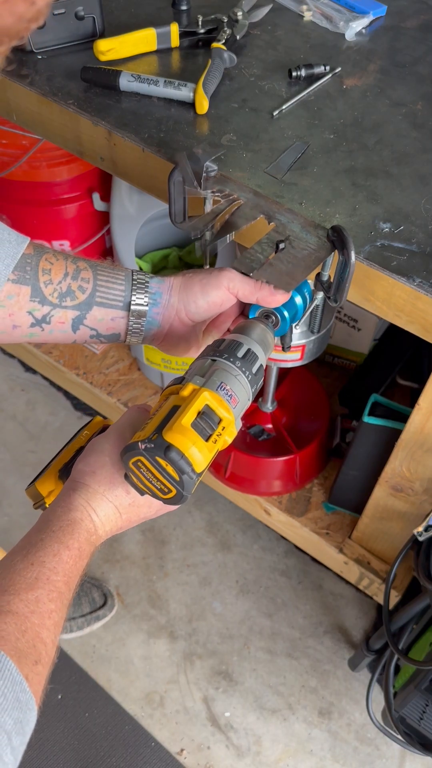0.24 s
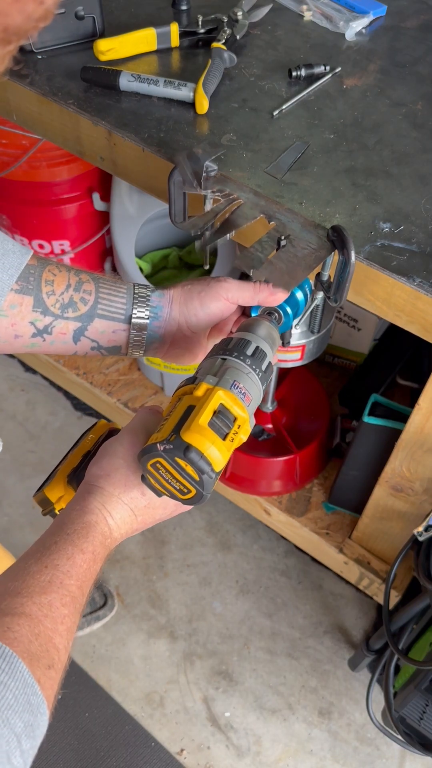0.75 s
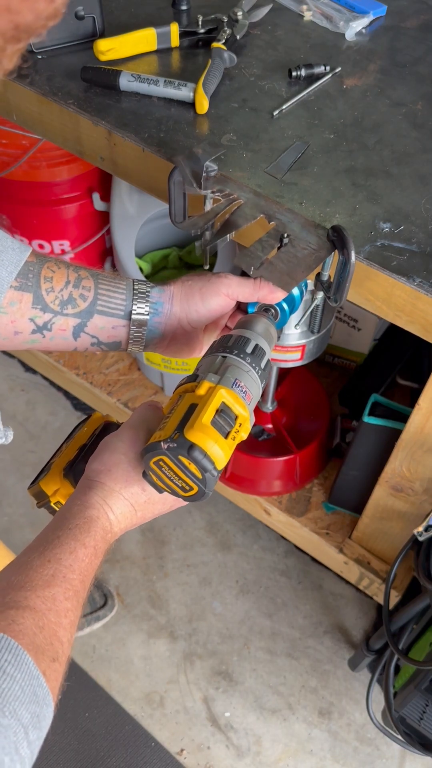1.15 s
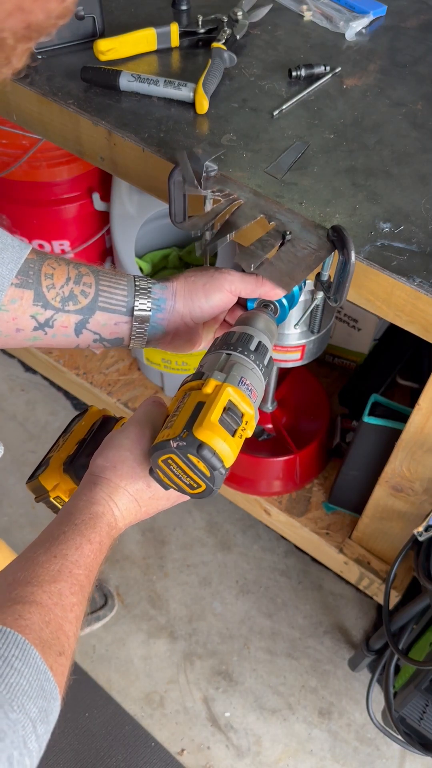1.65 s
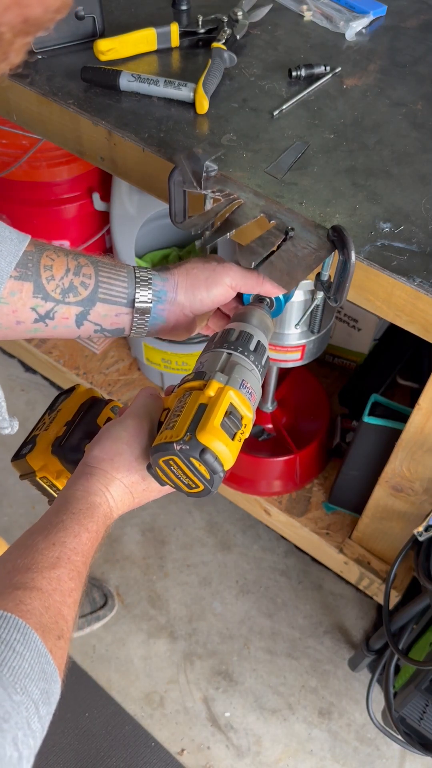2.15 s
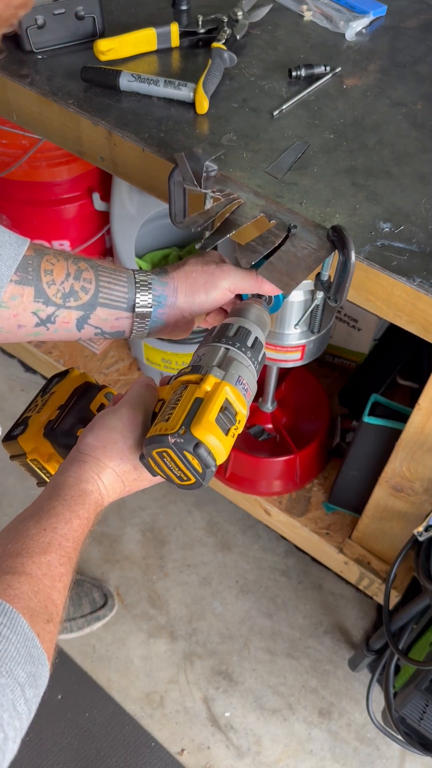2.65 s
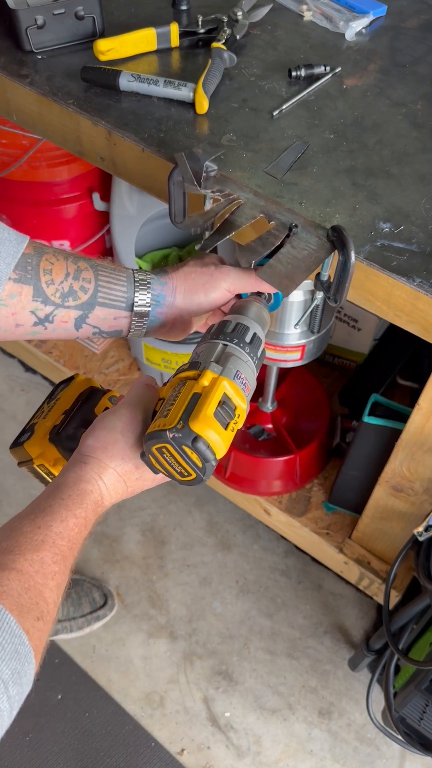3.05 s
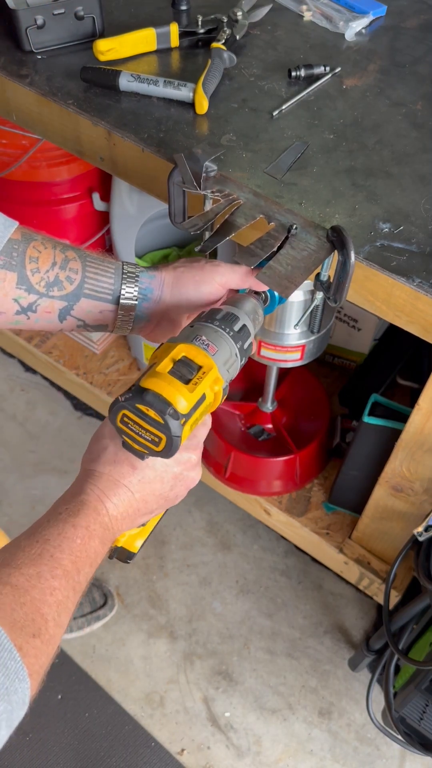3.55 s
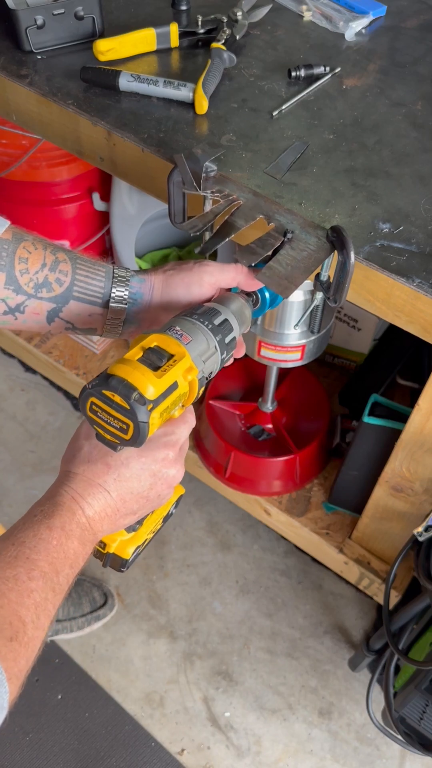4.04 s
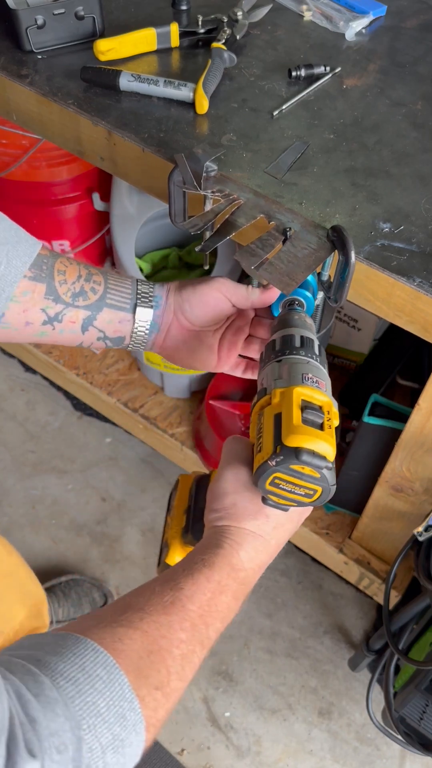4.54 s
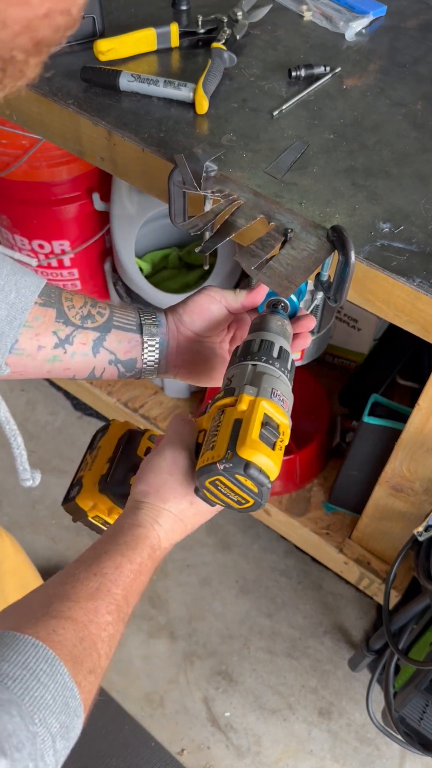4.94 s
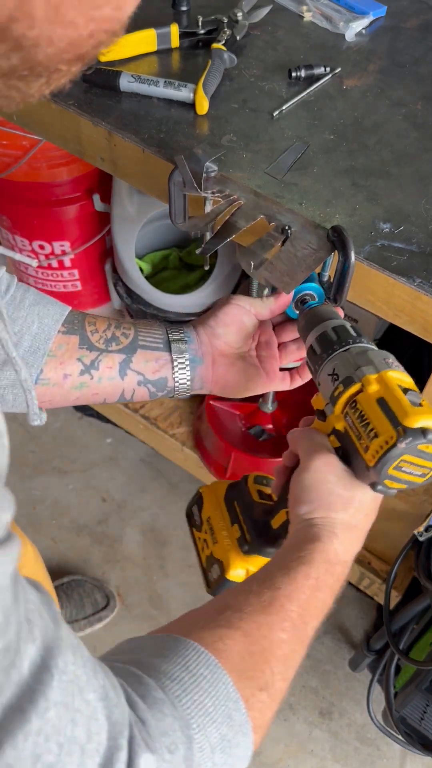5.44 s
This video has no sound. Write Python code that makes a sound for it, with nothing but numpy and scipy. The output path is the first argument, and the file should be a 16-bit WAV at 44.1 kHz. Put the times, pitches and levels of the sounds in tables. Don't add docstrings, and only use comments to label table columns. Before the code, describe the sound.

A loud, dry machine-gun clatter of punched sheet metal, with tinny ringing and a steady motor whine, briefly slackens early and then runs on. It pauses, a trigger clicks, and the motor whines through a weaker pull. Faint scuffs and a tiny can tap fill the next gap before hard cutting returns. Close stereo microphone, garage reverberation, occasional low air thumps.

```python
import sys
import numpy as np
from scipy import signal
from scipy.fft import rfft, irfft
from scipy.io import wavfile
from scipy.ndimage import uniform_filter1d

SR = 44100
rng = np.random.default_rng(int(sys.argv[2]) if len(sys.argv) > 2 else 0)


def convert_level_to_amplitude(level_db):
    exponent = np.asarray(level_db, float) / 20
    return 10 ** exponent


def generate_wav(signal):
    frames = np.transpose(np.atleast_2d(signal))
    scaled = np.clip(frames, -1, 1) * 32767
    pcm = np.round(scaled).astype(np.int16)
    wavfile.write(sys.argv[1], SR, pcm)


N = 250929


def at_hz(points, hz):
    points_hz, values = np.transpose(points)
    return np.interp(np.log(np.maximum(hz, 1)), np.log(points_hz), values)


def rms_one(x):
    return x / np.sqrt(np.mean(x ** 2) + 1e-20)


def played(spans, fade_s):
    s, *columns = np.transpose(np.vstack(spans))
    t = np.arange(N) / SR
    is_open = sum((t >= span[0][0]) & (t <= span[-1][0] + .01) for span in spans)
    gate = is_open.clip(0, 1) * 1.
    return uniform_filter1d(gate, int(fade_s * SR), mode="nearest"), [np.interp(t, s, c) for c in columns]


def band(x, low_hz, high_hz, order=2):
    sos = signal.butter(order, [low_hz, high_hz], "band", fs=SR, output="sos")
    return signal.sosfilt(sos, x + 1e-18)


def coloured(x, points):
    return irfft(rfft(x) * convert_level_to_amplitude(at_hz(points, np.fft.rfftfreq(N, 1 / SR))), N)


def drift(rate_hz):
    steps = rng.standard_normal(int(N / SR * rate_hz * 2) + 2)
    return np.interp(np.linspace(0, len(steps) - 1, N), np.arange(len(steps)), steps) * 1.285


def grains(count, spread_db):
    size = convert_level_to_amplitude(spread_db * np.minimum(rng.exponential(1, count), 5))
    return size * rng.standard_normal(count)


def sheet(x, wander_db):
    # frequency in Hz, width in Hz, gain in dB, liveliest from and to in seconds.
    modes = [(694, 28, 7, -1.5, 1), (810, 15, 3.5, 6, 2.7), (1110, 30, 3.5, -0.3, 1.55),
             (1309, 50, 6.5, 2.1, 2.3), (1700, 320, 3.5, 2, 2.9), (2240, 30, 3.5, -2, 0.68),
             (2650, 60, 4, -0.6, 1.5), (3850, 830, 4, 1.5, 5.7), (7240, 61, 4.5, 9, 2.5),
             (8050, 300, 3, 1.5, 9.6), (8700, 530, 2, -1, 4.3)]
    held_db = -3
    out, t = x.copy(), np.arange(N) / SR
    for hz, width_hz, top_db, start_s, end_s in modes:
        outside_s = np.maximum(start_s - t, t - end_s)
        level_db = top_db + held_db * np.clip(outside_s / 0.24, 0, 1)
        r = np.exp(-np.pi * width_hz / SR)
        gain = (1 - r * r) / 2
        ringing = signal.lfilter([gain, 0, -gain], [1, -2 * r * np.cos(2 * np.pi * hz / SR), r * r], x)
        out += np.maximum(convert_level_to_amplitude(level_db + wander_db * drift(2.5)) - 1, 0) * ringing
    return out


def cutting_strokes():
    # start in seconds, peak in dB, thud and clank in dB against
    # the peak, clank pitch in Hz.
    cut_strokes = [(0.024, -3, -20, -15.5, 2270), (0.07, -7, -15, -11.5, 2270), (0.114, -6, -17.5, -12, 2270),
                   (0.158, -10, -15, -10.5, 2620), (0.202, -8, -18.5, -17, 2290),
                   (0.515, -7, -21, -15, 2280), (0.56, -5.5, -12.5, -14.5, 2770),
                (0.605, -4, -15.5, -12.5, 3730), (0.65, -8, -18.5, -13.5, 2560),
                (0.694, -6.5, -14, -15, 2450), (0.739, -5.5, -17.5, -13, 2550),
                (0.784, -6.5, -19, -11, 2750), (0.828, -4.5, -23, -16, 2750), (0.872, -5.5, -25, -13, 3500),
                (0.917, -7.5, -20.5, -10.5, 3000), (0.964, -10, -13.5, -12, 2650),
                (1.008, -8, -13.5, -16, 2660), (1.053, -4, -18.5, -16, 2620),
                (1.097, -8.5, -16, -14.5, 2610), (1.143, -5.5, -23.5, -16.5, 2650),
                (1.187, -8, -14, -12.5, 3650), (1.232, -5.5, -20.5, -13.5, 3000),
                (1.278, -7, -20, -13.5, 2730), (1.322, -8, -13.5, -19.5, 2720),
                (1.368, -8, -12.5, -16.5, 2627), (1.412, -6, -19, -15.5, 1970),
                (1.457, -5, -18.5, -15, 2880), (1.502, -7, -13, -18, 4200), (1.546, -9, -13.5, -17.5, 2820),
                (1.592, -8.5, -15.5, -19, 1900), (1.637, -8, -13.5, -13.5, 3720),
                (1.681, -11, -17.5, -11, 1700), (1.725, -7.5, -15.5, -14, 3740), (1.77, -7, -15, -15, 2300),
                (1.815, -8, -19.5, -16, 3060),
                   (1.86, -9, -11, -14.5, 2847), (1.905, -7, -19, -13, 3860), (1.95, -8, -14.5, -16.5, 3110),
                  (1.993, -10.5, -12.5, -14.5, 3100), (2.038, -3, -21.5, -15.5, 4010),
                  (2.084, -8, -18.5, -15, 4200), (2.129, -12.5, -15, -14.5, 1840),
                  (2.174, -10, -17, -16.5, 1700), (2.218, -11.5, -12, -15.5, 1757),
                  (2.261, -8.5, -13, -14.5, 3040), (2.307, -5.5, -19, -17.5, 2240),
                  (2.353, -7.5, -16.5, -13.5, 3600), (2.397, -9, -12.5, -13, 3910),
                  (2.441, -9, -16, -14, 3276), (2.486, -10, -12.5, -12.5, 3880),
                  (2.532, -6, -17.5, -13.5, 3600), (2.576, -15.5, -8, -9.5, 3660),
                  (2.621, -7, -16.5, -10, 3200), (2.666, -8, -19, -16, 3850), (2.71, -8, -15.5, -14, 3770),
                  (2.755, -12, -18, -15, 3720), (2.799, -4.5, -20, -11, 3970),
                  (2.846, -4.5, -16, -17.5, 2220), (2.889, -8.5, -15, -10.5, 3730),
                  (2.935, -4, -21, -18, 3700), (2.979, -9, -12, -16, 2375),
                  (3.025, -10.5, -22.5, -14, 2240), (3.068, -6, -17, -13, 2970),
                  (3.113, -7.5, -18, -13.5, 4270),
                   (5.33, -7.5, -27, -9, 3780), (5.376, -9, -16.5, -17.5, 4460),
                (5.422, -1.5, -17, -15.5, 3840), (5.467, -3.5, -13.5, -12, 4600),
                (5.513, -8, -11, -21, 2300), (5.556, -6.5, -18, -14, 4350), (5.603, -5.5, -16, -14, 4060),
                (5.649, -6, -20.5, -16, 4140)]
    # break in seconds, edge peak in dB, thud
    # pitch in Hz, tear in ms.
    breaks = [(0.0254, -10, 1320, 2.2), (0.0715, -10.5, 750, 3.1), (0.1146, -10.5, 1310, 3.6),
              (0.1595, -17, 1640, 3.1), (0.2037, -14.5, 1340, 1.9), (0.5161, -11, 1270, 1.8),
              (0.5623, -11.5, 750, 1.8), (0.6075, -12.5, 750, 3.7), (0.6528, -8.5, 750, 1.4),
              (0.6965, -12, 750, 2.8), (0.74, -11.5, 750, 1.3), (0.7849, -12, 750, 1.7),
              (0.8296, -11, 1300, 0.7), (0.8744, -14, 1310, 0.9), (0.919, -8.5, 1160, 1.0),
              (0.9661, -11, 1340, 1.3), (1.0098, -12.5, 1290, 2.2), (1.0549, -7.5, 1770, 0.8),
              (1.0991, -12.5, 1560, 1.9), (1.1442, -11.5, 1340, 1.5), (1.1895, -12, 1290, 1.8),
              (1.2338, -9.5, 1130, 0.7), (1.279, -11, 1110, 1.3), (1.3237, -10, 1130, 1.6),
              (1.3685, -11, 1290, 2.2), (1.4125, -9.5, 1150, 1.4), (1.4587, -12, 1090, 1.0),
              (1.5044, -10, 1320, 2.2), (1.548, -14.5, 1310, 2.4), (1.5938, -13.5, 1320, 2.8),
              (1.6375, -16.5, 1310, 2.2), (1.6819, -14, 1310, 1.6), (1.7258, -12.5, 1290, 1.7),
              (1.771, -10, 1560, 2.1), (1.8164, -11.5, 1290, 0.8),
              (1.8623, -13.5, 750, 2.6), (1.9086, -8.5, 1740, 1.0), (1.9515, -14, 1290, 1.7),
                    (1.9948, -14.5, 1300, 1.5), (2.04, -5, 1330, 0.8), (2.0855, -12.5, 1180, 1.6),
                    (2.1298, -17.5, 1850, 1.6), (2.1782, -16, 1300, 2.1), (2.2163, -17, 1290, 1.9),
                    (2.2638, -13.5, 750, 1.7), (2.3083, -8.5, 1210, 1.0), (2.355, -11.5, 1700, 1.2),
                    (2.3984, -15, 1290, 1.8), (2.4435, -11, 970, 0.8), (2.488, -19, 950, 1.7),
                    (2.5334, -14, 970, 1.2), (2.578, -19, 1320, 1.4), (2.6218, -12.5, 1280, 2.0),
                    (2.6677, -12, 1470, 0.7), (2.712, -13.5, 1310, 1.9), (2.7564, -10.5, 950, 0.7),
                    (2.8005, -10, 940, 0.9), (2.848, -9, 1600, 2.0), (2.8904, -15, 1310, 1.4),
                    (2.9367, -6, 1470, 0.7), (2.9806, -16, 970, 2.0), (3.0262, -12.5, 970, 1.0),
                    (3.0695, -11.5, 990, 1.0), (3.1151, -16, 900, 1.1), (5.3313, -16, 1180, 0.8),
                    (5.378, -9, 1340, 0.7), (5.4236, -6.5, 1340, 1.6), (5.4694, -10.5, 1310, 1.7),
                    (5.5147, -7, 1290, 1.0), (5.5603, -8.5, 1680, 1.6), (5.6048, -8.5, 1550, 0.8),
                    (5.65, -5.5, 900, 0.7)]
    part_db = [-2, -4, -20]
    _, peak_db, thud_db, clank_db, clank_hz = np.array(cut_strokes).T
    s, edge_db, thud_hz, tear_ms = np.array(breaks).T
    tear_ms = abs(tear_ms)
    snap_db = 0.95 * (edge_db - edge_db.mean()) + 6.5 * np.log10(tear_ms / 1.6)
    press_s, rub_db = np.full_like(s, .0032), np.full_like(s, -13.0)
    crack_db, shear_ms = edge_db + 3.8, 1.9 * tear_ms
    return [s, press_s, peak_db + thud_db + part_db[0], peak_db + clank_db + part_db[1],
            snap_db + part_db[2], crack_db, shear_ms, thud_hz, clank_hz, rub_db]


def lone_strokes():
    # start in seconds, strength in dB, shear in ms, brightness in dB.
    lone = [(.248, -28.5, 12, -2), (.47, -25.5, 26, -1), (3.182, -22, 5, 1.2), (3.721, -21.5, 12.5, -1),
            (3.773, -21, 14.4, 0), (3.819, -23.5, 15.5, 0.5), (3.871, -22, 8.8, 0),
            (4.045, -30.5, 9.6, 4.5), (4.091, -28.5, 11, -3), (4.136, -27.5, 13, 0),
            (4.187, -22.5, 7.6, -1), (5.172, -23, 13, -0.5), (5.235, -20, 6.8, -2),
            (5.283, -18.5, 13.2, -3)]
    s, strength_db, shear_ms, bright_db = np.transpose(lone)
    shear_ms = abs(shear_ms)
    strength_db = strength_db + 10 * np.log10(shear_ms / 20.0)
    press_s = .00022 * shear_ms
    thud_hz, clank_hz, rub_db = np.full_like(s, 1100.0), np.full_like(s, 3840), np.full_like(s, -30.0)
    return [s + .5 * press_s, press_s, strength_db - 5 - bright_db, strength_db - 1,
            strength_db + 4.5 + bright_db, strength_db - 7.0, shear_ms * .75, thud_hz, clank_hz, rub_db]


def punch():
    # from and to in Hz, level in dB.
    parts = [(789, 2010, 4), (1673, 3450, 2), (3000, 4620, 2), (5720, 14230, 1)]
    # time in seconds, share in the long strip 0-1.
    free_share = [(0, 0.7), (.9, 0.1), (1.6, 0.53), (3.1, 0.46), (3.8, 1), (5.2, 0.01), (5.69, 0)]
    shudders_db = [-1.5, -11.5, -6.5, -3.5]
    thud_width, clank_width = .07, 0.089
    length = 2048
    t = np.arange(length) / SR
    hits = np.zeros(N + length)
    shudder = np.clip(t / 0.0072, 0, 1) * np.exp(-t / 0.0067)
    strokes = np.hstack([cutting_strokes(), lone_strokes()]).T
    for s, press_s, thud_db, clank_db, snap_db, crack_db, shear_ms, thud_hz, clank_hz, rub_db in strokes:
        after = t - press_s
        press = 0.32 * t / press_s
        shear = np.where(after < 0, press, np.exp(-abs(after) / (0.0008 * shear_ms)))
        rub = convert_level_to_amplitude(rub_db + 1.5 * rng.standard_normal()) * np.exp(-((after - .022) / 0.003) ** 2)
        burst = grains(length, spread_db=2.0)

        sounds = []
        for k, (low_hz, high_hz, level_db) in enumerate(parts):
            force = shear + convert_level_to_amplitude(shudders_db[k]) * shudder
            if k == 3:
                force = force + rub
            sounds.append(convert_level_to_amplitude(level_db) * rms_one(band(force * burst, low_hz, high_hz)))
        thud, long_strip, short_strip, snap = sounds

        tear = shear * burst
        low_ring = rms_one(band(tear, thud_hz * (1 - thud_width), thud_hz * (1 + thud_width), order=1))
        ring = rms_one(band(tear, clank_hz * (1 - clank_width), clank_hz * (1 + clank_width), order=1))
        thud = rms_one(thud + convert_level_to_amplitude(-1) * low_ring)
        share = np.clip(np.interp(s, *np.transpose(free_share)), 0, 1)
        strips = np.sqrt(share) * long_strip - np.sqrt(1 - share) * short_strip
        clank = rms_one(strips + convert_level_to_amplitude(4.5) * ring)
        snap = snap + convert_level_to_amplitude(-6.0) * rms_one(band(tear, 11900, 16000))

        at = round((s - press_s) * SR)
        stroke = convert_level_to_amplitude(thud_db) * thud + convert_level_to_amplitude(clank_db) * clank + convert_level_to_amplitude(snap_db) * snap
        hits[at:at + length] += np.sqrt(0.0065 / t[-1]) * stroke
        crack = band(burst * np.exp(-(after / 0.00028) ** 2), 2200, 13000, order=1)
        hits[at:at + length] += convert_level_to_amplitude(crack_db) * crack / np.max(abs(crack))
    return sheet(hits[:N], wander_db=1.5)


def rattle():
    # time in seconds, bite of the punch in dB, shake of the hands in dB.
    effort = [
        [(0, 1.5, 1.5), (.19, 2.3, -3.5), (.31, -4.5, -8.5), (.45, -9, -18), (.53, 0, -1.5), (1.45, 1.15, -8),
         (1.65, 0.3, -13), (2.0, 2, -11.5), (2.3, 0, -13.5), (2.6, -1, -15.5), (2.93, -1.5, -14),
         (3.05, -1.5, 2), (3.17, -9.5, 3)],
        [(3.6, -4.5, -18), (3.715, -7.5, -11), (3.73, -1.5, -5), (3.87, -6, -10), (4.017, -8.5, -13),
         (4.15, -6, -16), (4.21, 0.5, -6)],
        [(5.1, 3.5, -8), (5.17, -5.5, -14), (5.2, -1.5, -5), (5.3, 1.5, -1), (5.38, 1, -7), (5.45, 7, -5),
         (5.69, 2.5, -5)],
    ]
    # frequency in Hz, tilt in dB.
    colour = [(30, -22), (60, 1.5), (100, -10.5), (200, 2.5), (350, -4.5), (600, 4), (1500, 0),
              (3000, -2.5), (5000, -7.5), (8000, -3), (11000, -4.5), (12900, -18.5), (14800, 1.5)]
    # frequency in Hz, level in dB over the low rumble.
    throbs = [(67, -2.5), (89, 0.5)]
    splits_hz = [25, 350, 2200, 5500, 17000]
    bands_db = [-42, -31.5, -31, -22]
    bite_shares = [0.86, 0.9, 0.85, 0.73]
    slow_dulls = [1.0, 1.07, 0.8, 1.5]
    trigger_s = [3.6, 5.08]
    run_up_s, standstill_db = 0.15, -16.5
    gate, (bite_db, shake_db) = played(effort, fade_s=0.037)
    t = np.arange(N) / SR
    speed_db = 0
    for s in trigger_s:
        lack = np.clip(1 - (t - s) / run_up_s, 0, 1) ** 2
        speed_db = speed_db + standstill_db * (t > s - .05) * lack

    chatter = sheet(coloured(grains(N, spread_db=1.5), colour), wander_db=2.07)
    together = drift(40.0)
    bands = [rms_one(band(chatter, *splits_hz[k:k + 2], order=4)) for k in range(4)]
    for hz, level_db in throbs:
        bands[0] = bands[0] + convert_level_to_amplitude(level_db + 1.4 * drift(3.9)) * np.sin(2 * np.pi * hz * t)
    bands[0] = convert_level_to_amplitude(shake_db) * bands[0]

    out = 0
    for level_db, share, slow, sound in zip(bands_db, bite_shares, slow_dulls, bands):
        flicker_db = together + 1.2 * drift(25.0)
        out = out + convert_level_to_amplitude(level_db + share * bite_db + slow * speed_db - 3.5 + flicker_db) * sound
    return gate * out


def motor():
    # time in seconds, pole rate in Hz, whine in dB, overtone in dB.
    first_pull = [(0, 1552, -49.5, -43), (.23, 1554, -40.5, -46.5), (.28, 1546, -39, -37),
                  (.47, 1553, -43, -43.5), (.52, 1542, -45, -39), (1.2, 1552, -42.5, -50),
                  (1.9, 1547, -46.5, -51), (2.3, 1545, -48.5, -51), (3.14, 1545, -45, -54)]
    second_pull = [(3.72, 1385, -38, -58), (3.8, 1456, -40, -40), (3.866, 1504, -36, -42),
                   (4.0, 1536, -36, -37.5), (4.05, 1529, -40, -48), (4.1, 1558, -31, -41),
                   (4.145, 1537, -30, -46), (4.171, 1512, -52, -52), (4.189, 1480, -29, -58)]
    third_pull = [(5.2, 1332, -52.5, -61), (5.27, 1476, -44, -54.5), (5.369, 1475, -44, -43.5),
                  (5.501, 1486, -42, -48.5), (5.69, 1493, -43, -50)]
    # multiple of pole rate, level in dB rms.
    orders = [(.25, -54.5)]
    # time in seconds, level in dB rms.
    mesh_points = [(.1, -45), (.45, -44), (.6, -53), (1.7, -49.5), (2.1, -34.5), (2.7, -42), (3.1, -48),
                   (3.84, -58), (3.93, -41), (4.15, -45), (5.3, -48.5)]
    mesh_order = 5.75
    gate, (pole_hz, whine_db, overtone_db) = played([first_pull, second_pull, third_pull], fade_s=0.023)
    turn = 2 * np.pi * np.cumsum(pole_hz * (1 + .001 * drift(30.0))) / SR
    out = convert_level_to_amplitude(whine_db + 1.5 * drift(15)) * np.sin(turn)
    out += convert_level_to_amplitude(overtone_db + 1.5 * drift(10)) * np.sin(2 * turn)
    for multiple, level_db in orders:
        out += convert_level_to_amplitude(level_db + 3.0 * drift(8.0)) * np.sin(multiple * turn)
    mesh_db = np.interp(np.arange(N) / SR, *np.transpose(mesh_points))
    out += convert_level_to_amplitude(mesh_db + 3.0 * drift(8.1)) * np.sin(mesh_order * turn)
    return np.sqrt(2) * gate * out


def singing():
    # from and to in seconds, frequency in Hz, level in dB rms.
    rings = [(0, 0.29, 700, -45), (0.49, 0.76, 705, -35.5), (5.165, 5.29, 1400, -39), (.8, 1.303, 697, -42),
             (1.0, 1.975, 497.4, -42), (2.76, 2.94, 1078, -39), (2.92, 3.1, 1030, -43),
             (2.5, 3.08, 2280, -40), (2.87, 2.98, 7060, -38), (3.705, 3.917, 687, -37.5),
             (3.96, 4.08, 686, -43), (4.16, 4.235, 690, -43), (3.632, 3.75, 4230, -44),
             (5.12, 5.218, 4200, -43), (5.29, 5.453, 383, -41)]
    coherent_cycles = 14.0
    t, out = np.arange(N) / SR, 0
    for start_s, end_s, hz, level_db in rings:
        swell = np.clip(np.minimum(t - start_s, end_s - t) / 0.025, 0, 1)
        turn, rate_hz = 2 * np.pi * hz * t, round(hz, -2) / coherent_cycles
        ring = swell * (drift(rate_hz) * np.sin(turn) + drift(rate_hz) * np.cos(turn))
        out = out + convert_level_to_amplitude(level_db) * ring / np.sqrt(np.mean(ring[swell > 0] ** 2))
    return out


def chip_squeal():
    # from and to in seconds, from and to in Hz, level in dB rms.
    glide = (5.187, 5.211, 3950, 4500, -27)
    start_s, end_s, from_hz, to_hz, level_db = glide
    t = np.arange(N) / SR
    swell = np.clip(np.minimum(t - start_s, end_s - t) / 0.015, 0, 1)
    glide_hz = np.interp(t, [start_s, end_s], [from_hz, to_hz])
    return np.sqrt(2) * convert_level_to_amplitude(level_db) * swell * np.sin(2 * np.pi * np.cumsum(glide_hz) / SR)


def clicks():
    # start in seconds, peak in dB, brightness in dB, length in ms.
    contacts = [
        (3.548, -51, -11, 2.8),
        (3.579, -53, -28, 3),
        (3.591, -50, 6, 2.7),
        (3.618, -16.5, 2, 2.1),
        (4.976, -50, -17, 1.88),
        (5.08, -41.5, -26, 2.3),
        (5.094, -36, -2, 4),
        (5.257, -9, -5, 1.5),
        (5.5548, -10.5, 3, 1.5),
    ]
    scuffs = [
        (4.439, -54, 5, 25),
        (4.468, -57, 3.5, 29),
        (4.478, -43.5, -14, 22),
        (4.6, -65.5, 1.5, 6),
        (4.973, -47.5, -1.5, 22),
        (3.424, -72, 14, 3),
        (3.48, -76, 13, 5),
    ]
    # frequency in Hz, peak in dB, T60 in seconds.
    can_modes = [(409, -56, 0.24), (680, -59, 0.18), (1081, -49, 0.43), (1869, -61, 0.3), (2165, -64, .3),
                 (3640, -60, .1)]
    can_s = 4.972
    out, t = np.zeros(N + SR), np.arange(8192) / SR
    for s, peak_db, bright_db, length_ms in contacts + scuffs:
        crackle = rng.standard_normal(len(t)) * np.exp(-t / (0.0011 * abs(length_ms)))
        sound = 1.84 * band(crackle, 880, 5200) + convert_level_to_amplitude(bright_db + 5.5) * band(crackle, 3600, 11500)
        out[round(s * SR):][:len(t)] += convert_level_to_amplitude(peak_db - 5.5) * sound
    damped = np.clip((.11 - t) / 0.037, 0, 1)
    for hz, peak_db, t60_s in can_modes:
        ring = damped * convert_level_to_amplitude(peak_db - 60 * t / t60_s) * np.sin(2 * np.pi * hz * t)
        out[round(can_s * SR):][:len(t)] += ring
    return out[:N]


def puffs():
    # start in seconds, peak in dB, start phase in rad, wobble in dB.
    gusts = [
        (0.739, -25.5, 1.7, -12),
        (0.88, -30.5, 0.92, -1),
        (0.966, -21.5, -1.6, -4),
        (1.458, -20.5, 1.9, -9.5),
        (2.938, -30.5, 0.99, -9),
        (3.731, -52.5, 1.6, -20),
    ]
    out, t = np.zeros(N), np.arange(12000) / SR
    falling_hz = 50.0 + 660.0 * np.exp(-t / 0.0038)
    shape = np.clip(t / 0.005, 0, 1) * np.exp(-(t / 0.025) ** 3)
    wobble = 0.53 * np.exp(-((t - .1) / .055) ** 2) * np.sin(2 * np.pi * 44.0 * t)
    for s, peak_db, phase, wobble_db in gusts:
        swing = np.sin(2 * np.pi * np.cumsum(falling_hz) / SR + phase)
        out[round(s * SR):][:len(t)] += convert_level_to_amplitude(peak_db - 0.5) * (shape * swing + convert_level_to_amplitude(wobble_db) * wobble)
    return out


def treble_scatter(tool):
    return convert_level_to_amplitude(-10) * band(tool * drift(270), 3500, 10500, order=4) * [[1], [-1]]


def garage(x):
    # frequency in Hz, T60 in seconds.
    decay = [(100, 0.36), (500, 0.44), (2000, 0.42), (6000, 0.46), (14000, 0.18)]
    # frequency in Hz, likeness 0-1.
    likeness = [(100, 1), (300, 1), (1000, 0.47), (4000, 0.26), (8000, 0.4), (13000, 0.96)]
    t, edges_hz, tail = np.arange(SR // 2) / SR, 40 * 2 ** np.arange(0, 9.1, .75), 0
    for low_hz, high_hz in zip(edges_hz, edges_hz[1:]):
        hz = np.sqrt(low_hz * high_hz)
        alike = np.clip(at_hz(likeness, hz), 0, 1)
        mid, side = band(rng.standard_normal((2, len(t))), low_hz, high_hz)
        echoes = np.sqrt(1 + alike) * mid + np.sqrt(1 - alike) * side * [[1], [-1]]
        tail = tail + convert_level_to_amplitude(-60 * t / at_hz(decay, hz)) * echoes
    tail = tail * np.clip((t - .003) / 0.0034, 0, 1)
    tail = tail / np.sqrt(np.sum(tail ** 2) / 2)
    near = (rng.uniform(0.0011, .008, (2, 4)) * SR).astype(int)
    tail[[[0], [1]], near] += convert_level_to_amplitude(-8.5) * rng.choice([-1, 1], near.shape)
    return convert_level_to_amplitude(-11) * signal.fftconvolve(x[None], tail, axes=1)[:, :N]


def quiet_floor():
    # frequency in Hz, level in dB.
    hush_colour = [(18, -54), (30, -19), (70, -6.5), (113, -5), (149, -11.5), (187, -11), (286, -11.5),
                   (742, -19), (2500, -33), (10300, -41), (11800, -69.5), (22000, -120)]
    hush = rng.standard_normal((3, N))
    return convert_level_to_amplitude(-63) * rms_one(coloured(hush[0] + 0.37 * hush[1:], hush_colour))


def scene():
    tool = punch() + rattle() + singing() + chip_squeal() + clicks()
    whine = motor()
    return tool + treble_scatter(tool) + whine + garage(tool + 0.4 * whine) + quiet_floor() + puffs()


def low_pass(x):
    return signal.sosfilt(signal.butter(12, 17120, fs=SR, output="sos"), x)


def record(dry):
    # frequency in Hz, lead of the left port in rad.
    port_lead = [(0, 0), (4600, -.1), (5250, .4), (6700, -.1), (7150, -.6), (10700, -2.3), (11800, -3.1),
                 (13900, -3.2), (15400, -4.3)]
    cutoff_hz = 15750
    lead = np.interp(np.fft.rfftfreq(N, 1 / SR), *np.transpose(port_lead))
    ports = np.array([dry[0], irfft(rfft(dry[1]) * np.exp(-1j * lead), N)])
    soft = .8 * np.tanh(ports / .8)
    top_cut = signal.cheby2(16, 75, cutoff_hz + 400, fs=SR, output="sos")
    return low_pass(signal.sosfilt(top_cut, soft))


dry = scene()
out = record(dry)
generate_wav(out)
```